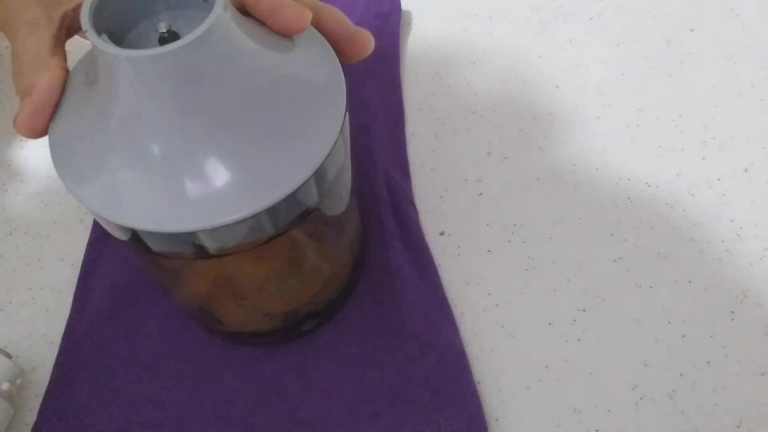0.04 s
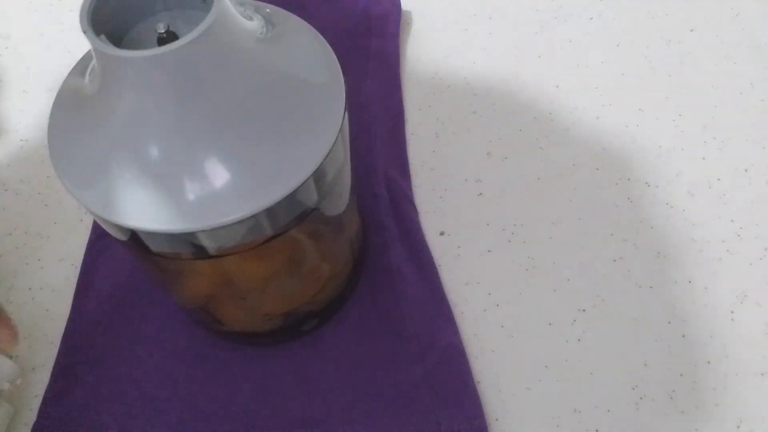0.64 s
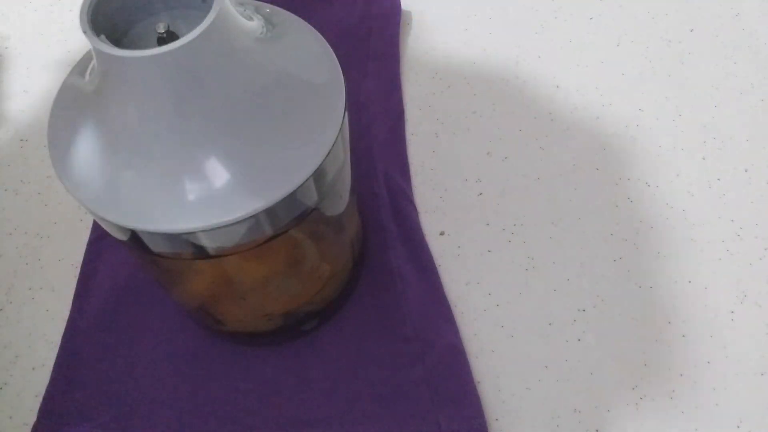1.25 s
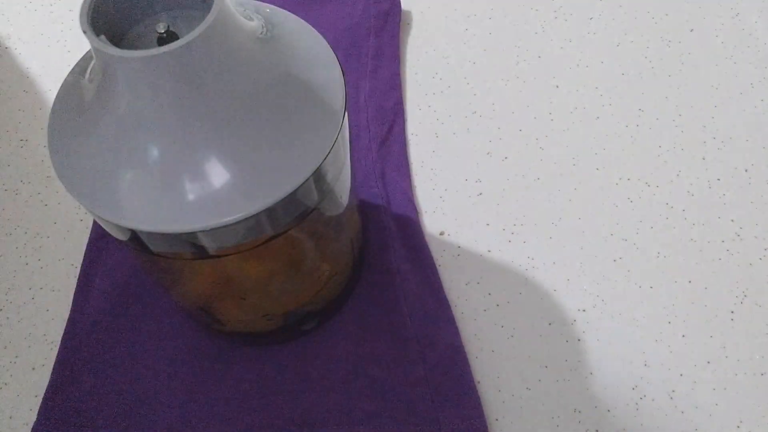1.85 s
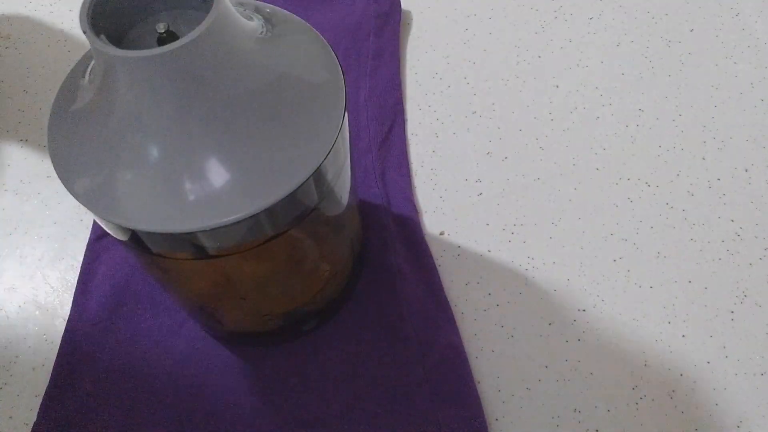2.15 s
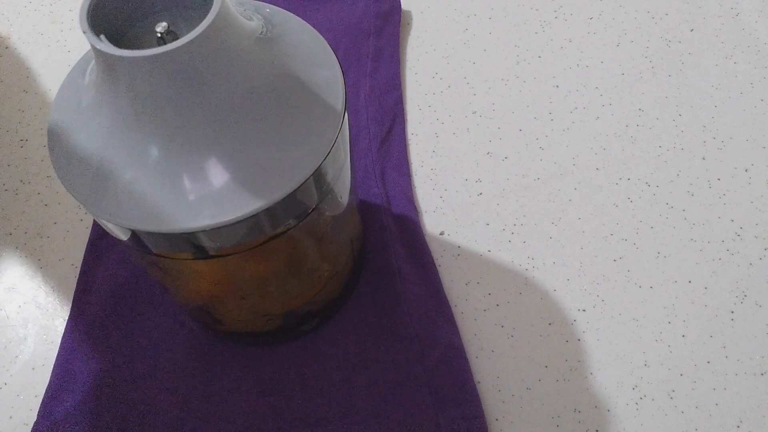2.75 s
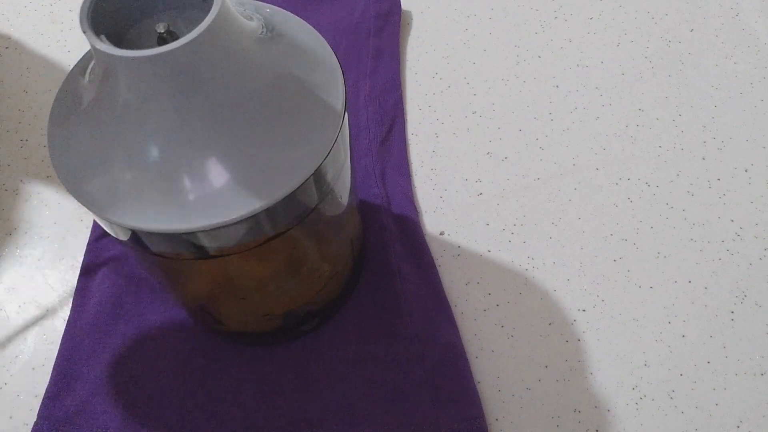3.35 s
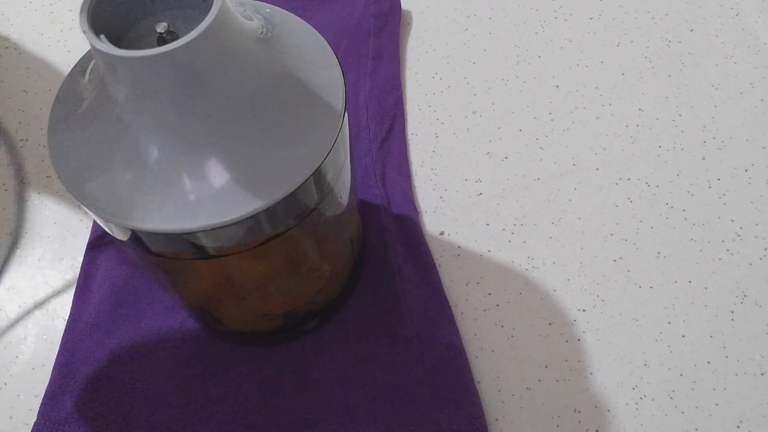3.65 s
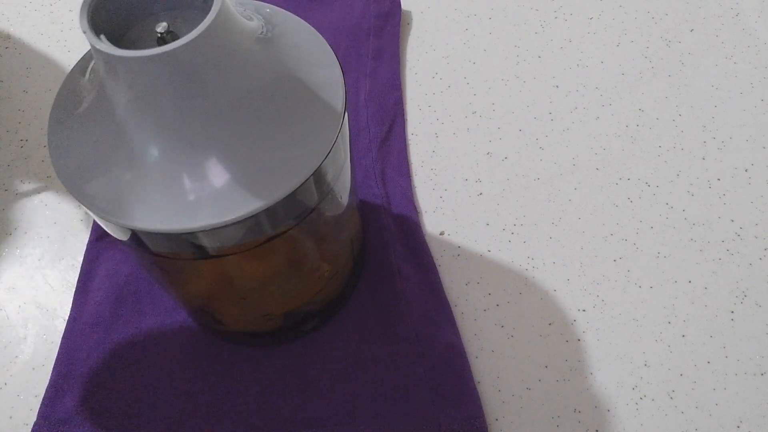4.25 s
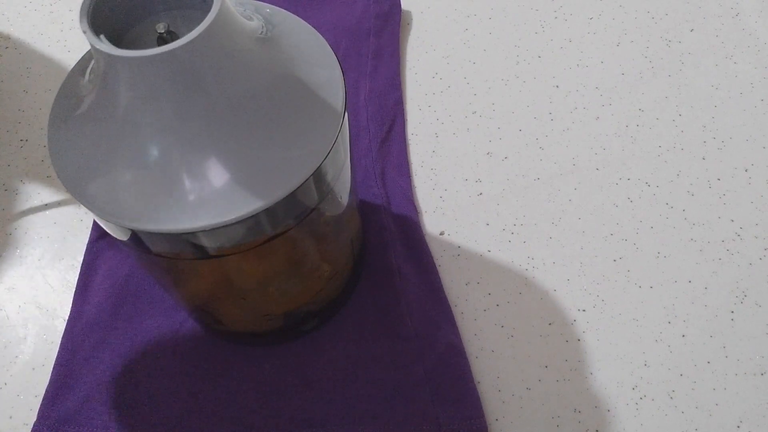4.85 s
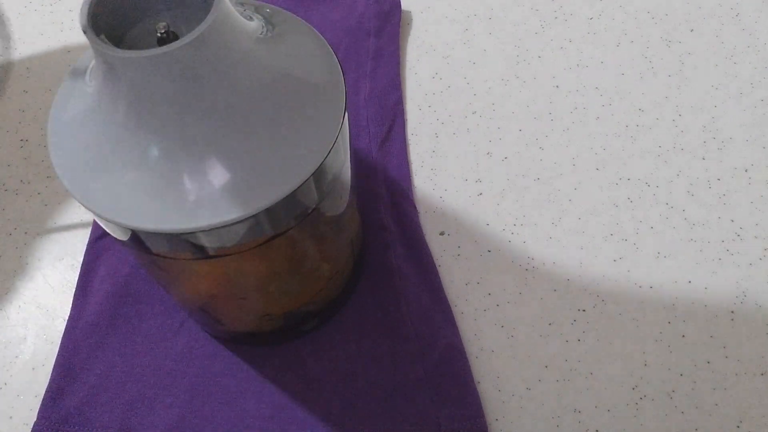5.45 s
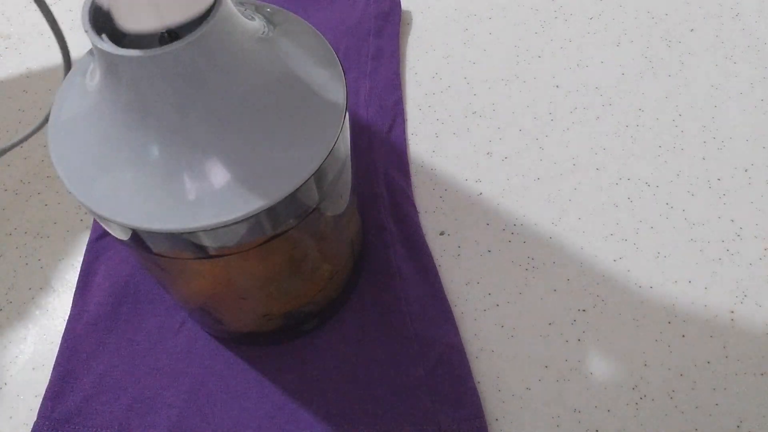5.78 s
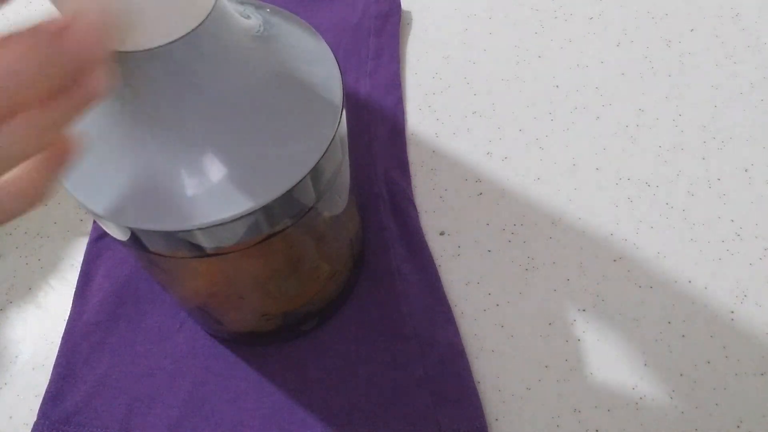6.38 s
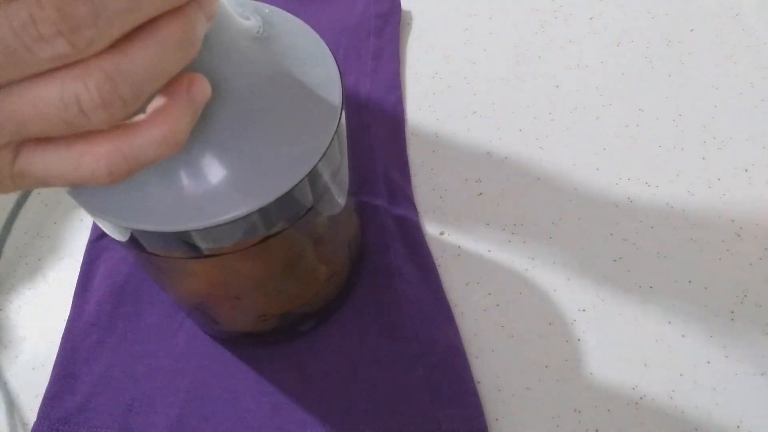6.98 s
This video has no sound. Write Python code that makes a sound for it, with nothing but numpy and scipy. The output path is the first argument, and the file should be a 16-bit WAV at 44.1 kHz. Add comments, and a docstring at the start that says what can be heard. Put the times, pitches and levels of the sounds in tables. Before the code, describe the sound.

A steel part clinks down, then a hand blender's motor unit knocks about and clatters onto a plastic lid, close up in a kitchen.

```python
"""Hand blender assembly

Close up, on a kitchen counter in a small, hard room. A steel part clinks down, the motor unit and its
plug knock about, then the unit clatters onto the plastic bowl lid and seats. Each blow is a click and
chatter through the part's resonances. Hands rustle and scrape between, over mains hum and a thin whine."""
import sys
import numpy as np
from scipy import signal
from scipy.fft import rfft, irfft
from scipy.io import wavfile
from scipy.ndimage import uniform_filter1d

SR = 44100
rng = np.random.default_rng(int(sys.argv[2]) if len(sys.argv) > 2 else 0)


def generate_wav(sig):
    """Save sig (samples, or channels by samples) to the path in sys.argv[1] as 16-bit PCM at SR."""
    pcm = np.round(np.clip(np.atleast_2d(sig).T, -1, 1) * 32767).astype(np.int16)
    wavfile.write(sys.argv[1], SR, pcm)


N = 309608

# Still air spectrum (frequency [Hz], level [dB])
AIR_SPECTRUM = [(12, -43), (25, -34), (48, -18.5), (98, -2), (154, -11.5), (300, -12.5), (650, -19),
                (900, -21), (1800, -26), (3500, -27.5), (4800, -23), (6300, -31.5), (13500, -30),
                (16000, -55)]
# Mains hum (frequency [Hz], rms [dB], waver depth [0-1], waver speed [Hz])
HUM_PARTIALS = [(48, -70.5, 0.5, 1.55), (100, -60, 0.44, 4.3), (200, -80.5, 0.85, 4.4)]
# Whine swells (peak time [s], level [dB], length [s])
WHINE_SWELLS = [(.9, -61, 0.03), (1.66, -61, 0.05), (1.87, -61, 0.028), (2.025, -62, .025),
                (5.28, -55, 0.076), (6.63, -61.5, 0.055)]

# Blows per part; weight adds lows, hardness adds highs, drag lengthens the contact
# (time [s], level [dB], weight [dB], hardness [dB], drag [x ordinary contact time])
MOTOR_BLOWS = [(.168, -52, -28, 16.5, 0.72), (.681, -50, -13, 10, 1.4), (.953, -49.5, -14, 17.5, 2.1),
               (1.033, -46.5, 6.5, -11, 1.8), (1.084, -45.5, -3, -4, 1.44), (1.937, -50, -15, 6, 1.5),
               (2.051, -36.5, 0, -7, 0.74), (2.066, -52, 25.5, 2.5, 1.36), (2.156, -62.5, 13, 33.5, 0.42),
               (2.178, -46.5, -11, 9, 1.8), (2.372, -37, -5.5, 10.5, 2.2), (2.4, -45, -5, 15.5, 2),
               (2.444, -51, -8, 26.5, 1.1), (2.613, -53.5, -25, 33, 0.91), (2.897, -51, 0.5, -9, 0.96),
               (3.101, -53, -14.5, 16, 1.24), (3.145, -48, -8.5, -11, 0.83), (3.361, -61, 9.5, 22, 0.52),
               (3.924, -19.5, -0.5, -19, 1), (3.947, -14.5, -2.5, -17, 1.1), (3.97, -28.5, 0, 12.5, 1.44),
               (3.985, -15, -10, -5, 0.86), (3.991, -12.5, -16, -1.5, 0.44), (3.997, -31.5, -5, 20.5, 0.48),
               (4.23, -31.5, 7.5, -15.5, 0.75), (4.247, -49, 19, 4.5, 1.03), (4.5, -52, 8, 19, 1.03),
               (4.608, -48, -1, 3, 1), (4.671, -50, 1, 6, 0.7), (4.707, -40, -2, 10, 2.9),
               (4.771, -40, -19, 13, 1.4), (4.896, -17, -17.5, 8.5, 0.61), (4.922, -25.5, 0.5, 1, 1.2),
               (4.93, -43, 16, 2, 1.3), (5.318, -60, 10, 18, 0.33), (5.33, -53.5, 4, 25, 0.46),
               (5.342, -53, 3.5, 20, 0.27), (5.352, -52.5, 2, 27, 0.35), (5.361, -55.5, 10, 22, 0.39),
               (5.382, -59, 10, 22, 0.39)]
STEEL_BLOWS = [(1.176, -19.5, 0.5, 14.5, .8), (1.183, -21.5, -1.5, 1.5, .9), (1.208, -17, -1.5, -7.5, 1),
               (1.214, -24, 11.5, -10, 1.1), (1.238, -29, 4, 3.5, 1)]
PLUG_BLOWS = [(3.561, -34.5, 4.5, 4, 1.3), (3.574, -35, -2, 17, 1.8), (3.606, -17.5, -4.5, 5, 0.63),
              (3.621, -23, -9, -19, 0.78)]
LID_BLOWS = [(5.808, -32.5, -2.5, 11.5, 0.9), (5.86, -23, -11.5, -27, .6), (5.891, -18.5, -3, 2.5, 0.61),
             (5.964, -46, 16, -1, 2.4), (6.03, -25.5, -2.5, -0.5, 0.64), (6.041, -25.5, 3, -1, 0.61),
             (6.05, -30.5, -2.5, 6.5, 1.3), (6.089, -45, 13, 10, 0.38), (6.143, -26, 0.5, -5, 0.48),
             (6.292, -64, -16, 32, 1.1), (6.384, -37, 9.5, 2, 2.7), (6.395, -18, -3.5, -6.5, 0.88),
             (6.409, -29, -5.5, 8, 1.43), (6.57, -38, -35, 15.5, 1.18)]
# Five bands of a blow
# (low [Hz], high [Hz], rise [s], crack time constant [s], room t60 [s], weight share, hardness share)
BLOW_BANDS = [(73, 315, 0.0032, 0.0053, 0.29, 1, 0.44), (300, 933, 0.00074, 0.013, 0.31, 0.88, 0),
              (1078, 3520, 0.0003, 0.014, .32, 0.17, 0.12),
              (3337, 6400, 0.00034, 0.0077, 0.33, 0.0059, 0.38),
              (6920, 15400, 0.00042, 0.0063, 0.31, 0.15, 1)]
# Band balance of an ordinary blow (bass [dB], body [dB], clack [dB], ring [dB], fizz [dB])
MOTOR_TONE_DB = [-7, -7, -7, -13.5, -21]
STEEL_TONE_DB = [-26.5, -13, -3.5, -2.5, -17]
PLUG_TONE_DB = [-15.5, -4, -3, -15, -37]
LID_TONE_DB = [-5, -2.5, -3, -10.5, -23.5]
# Resonances (frequency [Hz], width [Hz], level [dB])
MOTOR_PEAKS = [(207, 30, -1.5), (477.6, 21.5, 0.5), (592, 28, -6), (690, 36, 0), (850, 14, -10),
               (1297.6, 28, -3.5), (1510, 18, -3), (1731, 96, -6.5), (2275, 530, -12.5), (2990, 88, -23.5),
               (4080, 200, -24.5)]
STEEL_PEAKS = [(1998, 97, 8), (4220, 86, 2), (5280, 150, -1.5), (6780, 60, -7), (7915, 260, -12.5),
               (9860, 126, -15.5), (11250, 89, -13.5), (13000, 33, -19.5), (13760, 70, -24.5),
               (14800, 58, -28)]
PLUG_PEAKS = [(877, 87, -0.5), (1096, 18, -5), (1340, 18, -13), (2770, 14, -20), (3230, 130, -19.5),
              (4330, 180, -22.5), (5280, 79, -19.5), (6900, 43, -45)]
LID_PEAKS = [(210, 42, 3.5), (460, 48, 0), (1079, 27, -8.5), (1720, 210, -8.5), (1910, 44, -15),
             (2520, 560, -15.5), (3440, 41, -23), (4500, 180, -20)]
SCRAPE_PEAKS = [(1363, 15, 2), (1533, 230, -5), (1756, 110, -3), (1963, 96, -7.5), (2277, 110, -13.5),
                (3150, 50, -30), (4430, 230, -13)]
# Wash of dense, unresolved modes (frequency [Hz], level [dB])
MOTOR_WASH = [(45, -31.5), (70, -19), (200, -11.5), (380, -12), (480, -5.5), (700, -7), (1020, -8),
              (1300, -7), (1650, -6), (3000, -12.5), (8300, -31.5), (10900, -23), (16000, -40)]
STEEL_WASH = [(45, -42.5), (110, -7.5), (180, -22), (310, -5), (480, -4.5), (900, -3), (2500, -4.5),
              (4200, -17.5), (4700, -19.5), (5400, -17.5), (6000, -25), (7400, -29), (8900, -35.5),
              (11000, -27), (16000, -41.5)]
PLUG_WASH = [(41, -42), (70, -18), (113, -11.5), (178, -29.5), (307, -7), (711, -0.5), (872, -6.5),
             (1200, -16.5), (4380, -29), (11600, -54), (16000, -82)]
LID_WASH = [(41, -56), (70, -22.5), (103, -4), (155, -19), (208, -4), (344, -2.5), (606, -1.5),
            (1280, -11.5), (1890, -10), (3040, -26), (4480, -23.5), (5500, -31.5), (9270, -44),
            (11600, -35.5), (16000, -54)]
SCRAPE_WASH = [(500, -26), (1200, -27), (1900, -50), (2500, -29.5), (6000, -34.5), (12000, -43)]

# Soft bumps on counter and housing (time [s], peak [dB], frequency [Hz])
BUMPS = [(.668, -40.5, 84.6), (.925, -47, 87), (1.199, -27, 475), (2.059, -59, 101), (2.07, -37, 210),
         (2.091, -40, 344), (2.366, -56, 211), (3.549, -33.5, 101), (3.875, -35.5, 684),
         (3.995, -38.5, 205), (4.069, -40, 182), (4.238, -30.5, 122), (4.26, -40.5, 480),
         (4.535, -49.5, 97), (4.724, -42, 96), (4.883, -36, 100), (5.333, -31.5, 103), (5.319, -37.5, 274),
         (6.392, -39, 106)]
# Grip slips and hand strokes (peak time [s], level [dB], length [s])
SCRAPES = [(.742, -53.5, 0.026), (3.905, -47.5, 0.11), (4.506, -48.5, 0.027), (4.714, -37, 0.022),
           (4.887, -36.5, 0.037), (4.898, -27, 0.016), (5.22, -54.5, 0.15), (5.37, -55, 0.14),
           (5.488, -44, 0.017)]
BRUSHES = [(.87, -52.5, 0.082), (1.466, -55.5, 0.045), (1.575, -50, 0.028), (1.7, -48, 0.018),
           (1.796, -41.5, 0.034), (1.955, -52.5, 0.04), (2.118, -55.5, 0.039), (2.625, -46, 0.018),
           (2.696, -49.5, 0.083), (2.975, -58.5, 0.078), (5.355, -46.5, 0.024), (6.21, -61, 0.04)]
# Hiss of a hand stroke (frequency [Hz], level [dB])
BRUSH_SPECTRUM = [(1470, -17), (2500, -13), (2720, -23), (3440, -12.5), (3740, -12.5), (4650, -5.5),
                  (6200, -13.5), (7830, -9.5), (9660, -9), (10300, 2.5), (11500, 1.5), (14500, -3.5),
                  (16000, -17)]

# Modes of steel part, plug pins, motor housing, lid drive coupling (frequency [Hz], level [dB], t60 [s])
STEEL_MODES = [(2026, -3, .24), (2152, -4, .22), (2880, -12, .12), (3057, -9, .26), (4040, -7, .24),
               (4098, -1.5, .27), (4161, -12, .22), (5270, -1, .17), (5545, -12, .27), (6610, -4, .26),
               (7208, -15, .16), (7990, -14, .2), (8100, -13, .18), (9523, -21, .17), (11164, -16, .17),
               (12920, -20, .2), (13420, -25, .22), (14880, -28, .22)]
PIN_MODES = [(5300, -3, .11), (6780, -5, .22), (7200, -10, .12), (8150, -11, .14)]
HOUSING_MODES = [(678, -1, 0.057), (800, -3, 0.057)]
COUPLING_MODES = [(1865, -13, 0.5), (1984, 10.5, 0.033), (3510, 6, 0.036), (4390, -6, 0.26)]
# Strikes that excite them (time [s], level [dB])
STEEL_STRIKES = [(1.176, -22.5)]
PIN_STRIKES = [(3.559, -44), (3.606, -59)]
HOUSING_STRIKES = [(3.932, -13)]
COUPLING_STRIKES = [(5.892, -26)]

# Left level over right (frequency [Hz], level [dB])
LEFT_GAIN = [(500, 0), (800, .3), (1300, 1.9), (2200, 1.4), (3500, 0), (15000, 0)]
# Left phase lead (frequency [Hz], phase [rad])
LEFT_LEAD = [(250, .0023), (600, 0.005), (1200, 0.022), (2400, 0.38), (3500, .011), (5500, 0.0072),
             (8000, 0.53), (13000, .08)]


def amp(db):
    """Decibels to gain."""
    return 10 ** (np.asarray(db) / 20)


def unit_rms(x):
    """Scale to rms 1."""
    return x / np.sqrt(np.mean(x ** 2) + 1e-20)


def curve_at(points, hz):
    """Interpolate on a log-frequency axis."""
    points_hz, values = np.transpose(points)
    return np.interp(np.log(hz + 1), np.log(points_hz + 1), values)


def add(mix, time_s, sound):
    """Mix a sound in at time_s."""
    part = mix[max(round(time_s * SR), 0):][:len(sound)]
    part += sound[:len(part)]


def bandpass(x, low_hz, high_hz, order=3):
    """Causal band-pass."""
    return signal.sosfilt(signal.butter(order, [low_hz, high_hz], "band", fs=SR, output="sos"), x)


def shaped_noise(spectrum):
    """Noise with the given smooth spectrum."""
    gain = amp(curve_at(spectrum, np.fft.rfftfreq(N, 1 / SR)))
    return irfft(rfft(rng.standard_normal(N)) * gain, N)


def drift(speed_hz):
    """Slow random motion, rms 1, up to about speed_hz."""
    lowpass = np.exp(-(np.fft.rfftfreq(N, 1 / SR) / speed_hz) ** 2)
    return unit_rms(irfft(rfft(rng.standard_normal(N)) * lowpass, N))


def swells(rows, rise, fall):
    """Gain that grows to each peak and decays; time constants are rise and fall times the row's length."""
    power, t = np.zeros(N), np.arange(N) / SR
    for peak_s, db, length_s in rows:
        distance_s = np.maximum((peak_s - t) / rise, (t - peak_s) / fall)
        power += (amp(db) * np.exp(-distance_s / length_s)) ** 2
    return np.sqrt(power)


def still_air(midband_db=-64):
    """Steady room noise."""
    air = shaped_noise(AIR_SPECTRUM)
    return amp(midband_db) * air / bandpass(air, 300, 14000).std()


def mains_hum():
    """Low partials, wavering in level and phase."""
    out, t = np.zeros(N), np.arange(N) / SR
    for hz, db, waver, speed_hz in HUM_PARTIALS:
        phasor = 1 + waver * (drift(speed_hz) + 1j * drift(speed_hz))
        out += amp(db) * unit_rms((phasor * np.exp(2j * np.pi * hz * t)).real)
    return out


def whine(pitch_hz=4770, wander_hz=9, floor_db=-71.5, flicker_db=7):
    """One faint, unsteady high tone with short swells."""
    cycles = np.cumsum(pitch_hz + wander_hz * drift(12)) / SR
    flicker = amp(flicker_db * np.tanh(1.2 * drift(26)))
    tone = unit_rms(np.sin(2 * np.pi * cycles) * flicker)
    return tone * (amp(floor_db) + swells(WHINE_SWELLS, rise=0.86, fall=1))


def part_response(wash, peaks, peaks_db, ripple_db=2, size=8192):
    """Impulse response of a part: resonances above a rippled wash of dense modes."""
    hz = abs(np.fft.fftfreq(size, 1 / SR))
    grid_hz = np.linspace(0, SR / 2, size // 16)
    ripple = np.interp(hz, grid_hz, rng.standard_normal(len(grid_hz)))
    wash_power = amp(curve_at(wash, hz) + ripple_db * ripple) ** 2
    peak_power = sum(amp(db + peaks_db) ** 2 / (1 + (2 * (hz - centre_hz) / width_hz) ** 2) ** 2
                     for centre_hz, width_hz, db in peaks)
    log_gain = np.log(peak_power + wash_power + 1e-10) / 2
    minimum_phase = np.exp(np.conj(signal.hilbert(log_gain)))
    return np.fft.ifft(minimum_phase).real[:size // 2]


def blows(rows, response, tone_db, click, room_db):
    """Click, chatter and room tail through the struck part. Drag: softer click, longer chatter, more room."""
    out, t = np.zeros(N), np.arange(SR // 2) / SR
    for time_s, blow_db, weight_db, hardness_db, drag in rows:
        chatter = rng.standard_normal(len(t))
        for band_db, band in zip(tone_db, BLOW_BANDS):
            low_hz, high_hz, rise_s, crack_s, t60_s, weight_share, hardness_share = band
            attack = 1 - np.exp(-t / (rise_s * drag))
            crack = np.exp(-t / (crack_s * drag))
            tail = drag * amp(room_db) * np.exp(-np.log(1000) * t / t60_s)
            force = chatter * attack * (crack + tail)
            force[SR // 1000] += click / drag
            sound = bandpass(signal.fftconvolve(force, response)[:len(t)], low_hz, high_hz)
            peak_rms = np.sqrt(uniform_filter1d(sound ** 2, size=400).max())
            level_db = blow_db + band_db + weight_share * weight_db + hardness_share * hardness_db
            add(out, time_s, amp(level_db) * sound / peak_rms)
    return out


def bumps(band_ratio=1.14, base_rise_s=0.028, rise_cycles=0.82):
    """Soft pushes swell and die in one low resonance of counter or housing; the lower, the slower."""
    out, t = np.zeros(N), np.arange(SR // 2) / SR
    for time_s, peak_db, hz in BUMPS:
        rise_s = base_rise_s + rise_cycles / hz
        swing = bandpass(rng.standard_normal(SR), hz / band_ratio, hz * band_ratio, order=2)[-len(t):]
        boom = swing * (t / rise_s) ** 2 * np.exp(-2 * t / rise_s)
        add(out, time_s, amp(peak_db) * boom / abs(boom).max())
    return out


def scraping(gain_db=-2, slips_per_s=900):
    """Plastic slips in the grip: tiny impulses ring the housing, catching fast and running out."""
    slips = rng.standard_normal(N) * (rng.random(N) < slips_per_s / SR)
    housing = part_response(SCRAPE_WASH, SCRAPE_PEAKS, peaks_db=-3.5)
    rasp = unit_rms(signal.fftconvolve(slips, housing)[:N])
    return amp(gain_db) * rasp * swells(SCRAPES, rise=0.28, fall=1.43)


def brushing(flutter_db=2):
    """Skin slides on smooth plastic and cloth: fine, uneven hiss."""
    hiss = unit_rms(shaped_noise(BRUSH_SPECTRUM))
    return hiss * amp(flutter_db * drift(40)) * swells(BRUSHES, rise=0.88, fall=1)


def ringing(strikes, modes, split_hz, partner_gain=0.32, rise_s=0.00036):
    """A struck part rings on; each mode is a close pair that beats."""
    out, t = np.zeros(N), np.arange(SR * 2 // 3) / SR
    attack = 1 - np.exp(-t / rise_s)
    for time_s, strike_db in strikes:
        for hz, mode_db, t60_s in modes:
            phase, partner_phase, gap = rng.random(3)
            partner_hz = hz + split_hz * (gap + 0.5)
            pair = np.sin(2 * np.pi * (hz * t + phase))
            pair += partner_gain * np.sin(2 * np.pi * (partner_hz * t + partner_phase))
            decay = np.exp(-np.log(1000) * t / t60_s)
            add(out, time_s, amp(strike_db + mode_db) * pair * attack * decay)
    return out


def stereo(mono):
    """Two close microphone ports: small level and phase offsets."""
    hz = np.fft.rfftfreq(N, 1 / SR)
    left = amp(curve_at(LEFT_GAIN, hz) / 2) * np.exp(1j * curve_at(LEFT_LEAD, hz) / 2)
    return irfft(rfft(mono) * np.array([left, 1 / left]), N)


def scene():
    """All sources at one spot, slightly left."""
    steel = part_response(STEEL_WASH, STEEL_PEAKS, peaks_db=-3.5)
    mix = blows(STEEL_BLOWS, steel, STEEL_TONE_DB, click=8, room_db=-3)
    plug = part_response(PLUG_WASH, PLUG_PEAKS, peaks_db=0)
    mix += blows(PLUG_BLOWS, plug, PLUG_TONE_DB, click=5.1, room_db=-3)
    motor = part_response(MOTOR_WASH, MOTOR_PEAKS, peaks_db=3.5)
    mix += blows(MOTOR_BLOWS, motor, MOTOR_TONE_DB, click=3.6, room_db=-11)
    lid = part_response(LID_WASH, LID_PEAKS, peaks_db=3)
    mix += blows(LID_BLOWS, lid, LID_TONE_DB, click=4.9, room_db=-5.5)
    mix += ringing(STEEL_STRIKES, STEEL_MODES, split_hz=12)
    mix += ringing(PIN_STRIKES, PIN_MODES, split_hz=22)
    mix += ringing(HOUSING_STRIKES, HOUSING_MODES, split_hz=36)
    mix += ringing(COUPLING_STRIKES, COUPLING_MODES, split_hz=13.6)
    return stereo(mix + bumps() + brushing() + scraping() + whine() + still_air() + mains_hum())


def record(dry):
    """Steep treble cut."""
    cutoff_hz = 15900
    lowpass = signal.firwin(511, cutoff_hz, window=("kaiser", 9), fs=SR)
    return signal.oaconvolve(dry, lowpass[None], "same")


dry = scene()
out = record(dry)
generate_wav(out)
```